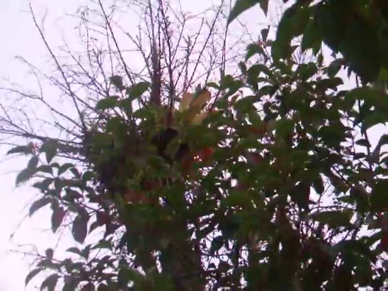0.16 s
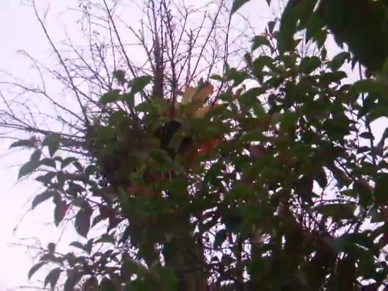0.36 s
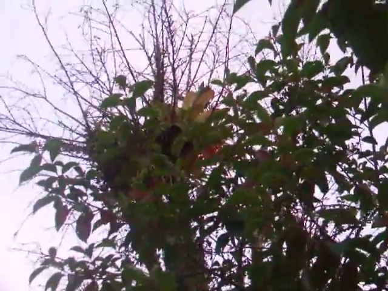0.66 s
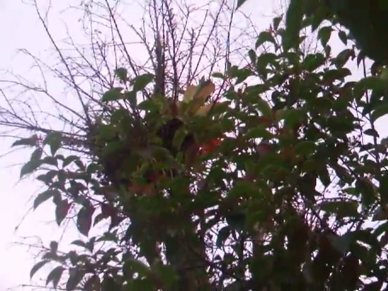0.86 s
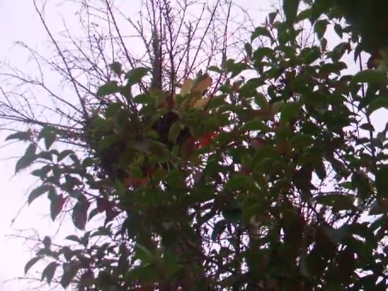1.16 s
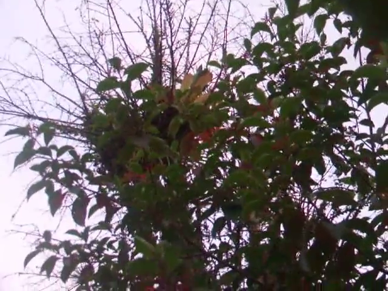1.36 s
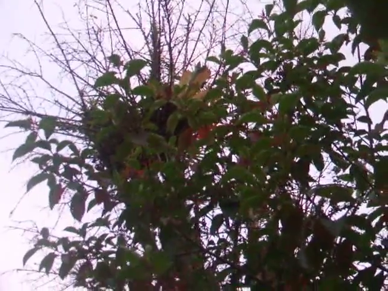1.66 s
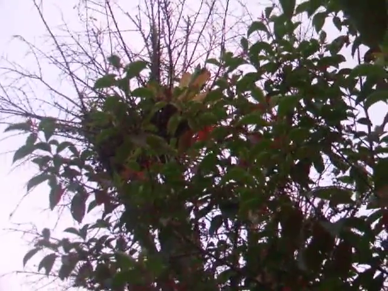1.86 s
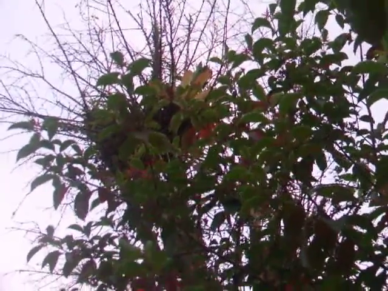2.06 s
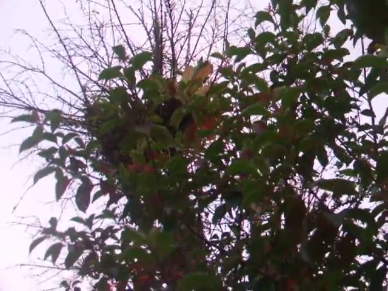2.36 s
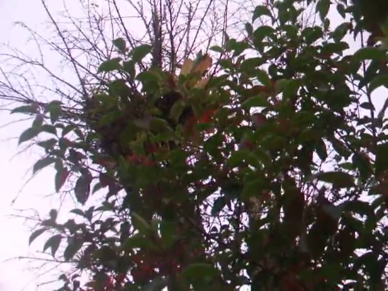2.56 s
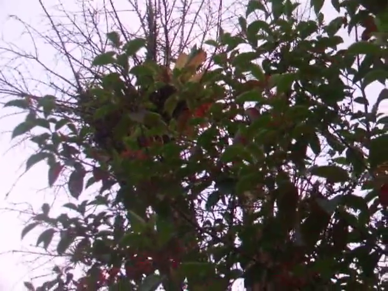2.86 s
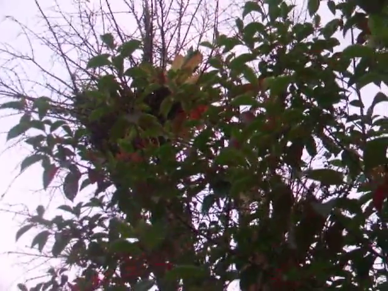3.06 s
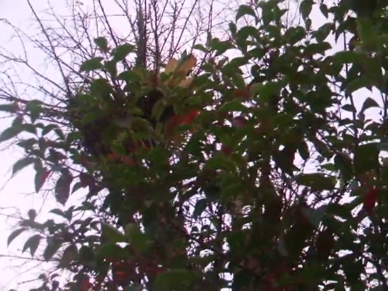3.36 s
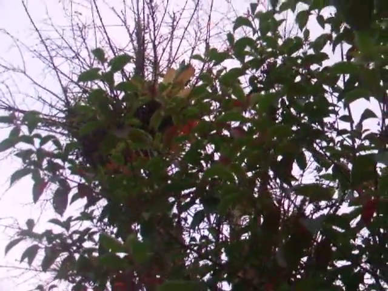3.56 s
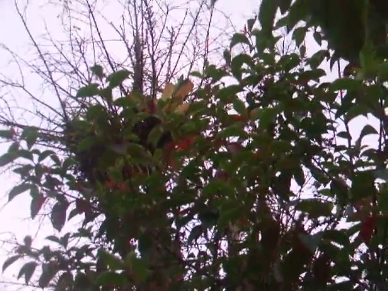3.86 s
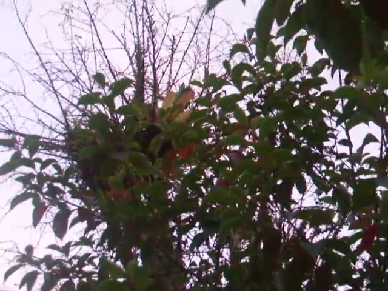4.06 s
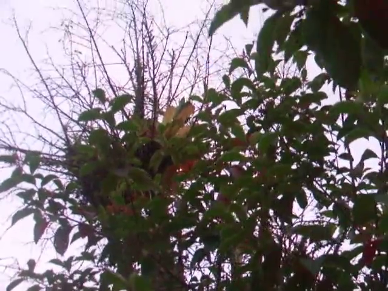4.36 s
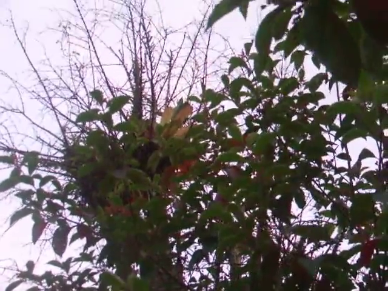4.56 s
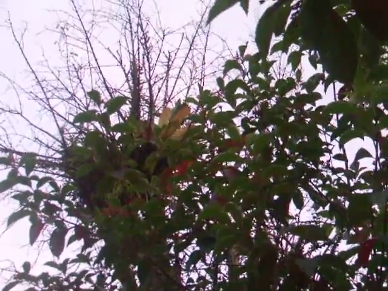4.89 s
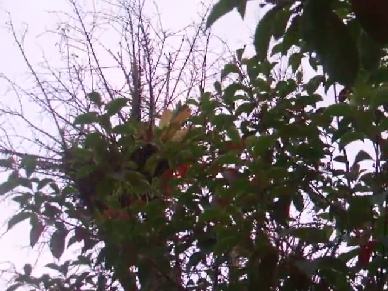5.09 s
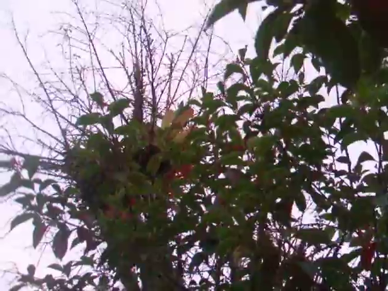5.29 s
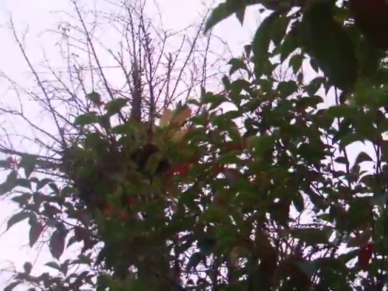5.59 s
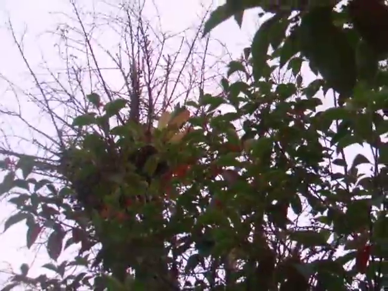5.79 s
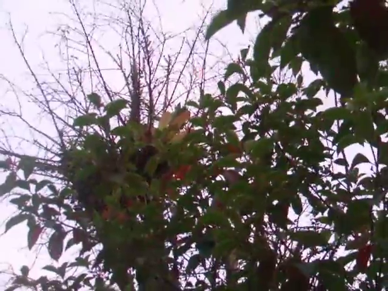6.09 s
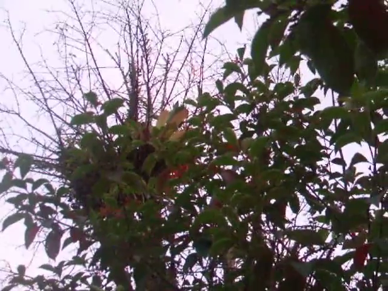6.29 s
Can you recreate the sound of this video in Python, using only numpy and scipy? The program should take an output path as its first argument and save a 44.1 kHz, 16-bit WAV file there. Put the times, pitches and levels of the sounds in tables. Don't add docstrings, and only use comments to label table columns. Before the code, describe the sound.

A dawn garden heard through a modest pocket camera: steady low hum and hiss, a barely audible high whine, and echoes scattered by branches and walls. Lower fluting whistles come in phrases further away, with small chips far off. Nearby finches cut through with sharp, sizzling falling calls, busiest in the middle, then again near the end. A sparrow rasps near the start, snaps its bill, and rasps once more at the close.

```python
import sys
import numpy as np
from scipy import signal
from scipy.fft import rfft, irfft
from scipy.io import wavfile
from scipy.ndimage import uniform_filter1d

SR = 44100
rng = np.random.default_rng(int(sys.argv[2]) if len(sys.argv) > 2 else 0)


def linear_from_db(decibels):
    return 10 ** (np.asarray(decibels, float) / 20)


def dump_mix(stems):
    frames = np.atleast_2d(stems).T
    limited = np.clip(frames, -1, 1)
    pcm = np.round(limited * 32767).astype(np.int16)
    wavfile.write(sys.argv[1], SR, pcm)


N = 283563
RATE_HZ = 16000


def level(x, db):
    return x * linear_from_db(db) / np.sqrt(np.mean(x ** 2))


def walk(size, rate):
    hold = int(SR / rate)
    steps = np.repeat(rng.standard_normal(size // hold + 1), hold)
    return 1.3 * uniform_filter1d(uniform_filter1d(steps, hold), hold)[:size]


def resonance(x, hz, width):
    return signal.lfilter(*signal.iirpeak(hz, hz / width, SR), x)


def add(track, s, sound):
    i = int(s * SR)
    track[i:i + len(sound)] += sound[:len(track) - i]


def syrinx(notes, buzz_hz, uneven, chaos, throb, flutter_db, second_db, edge):
    out = np.zeros(N)
    for note in notes:
        s, *columns = np.transpose(note)
        t = s[0] + np.arange(int((s[-1] - s[0]) * SR)) / SR
        hz, db, swing_hz = (np.interp(t, s, column) for column in columns)
        swing_hz = np.abs(swing_hz)
        drift, shake, flutter = (walk(SR // 2, rate)[:len(t)] for rate in (90, 500, 130))
        buzz = np.cumsum(buzz_hz * (1 + uneven * drift)) * 2 * np.pi / SR
        wobble = np.sin(buzz) - 0.26 * np.cos(2 * buzz) + chaos * np.tanh(shake)
        phase = np.cumsum(hz + swing_hz * wobble) * 2 * np.pi / SR
        tone = np.sin(phase) + linear_from_db(second_db) * np.sin(2 * phase)
        depth = np.clip(throb * swing_hz / 300, 0, .9)
        ends = np.clip(np.minimum(t - s[0], s[-1] - t) / edge, 0, 1)
        strength = np.sqrt(2) * linear_from_db(db + flutter_db * flutter) * ends
        add(out, s[0], strength * (1 + depth * np.cos(buzz)) * tone)
    return out


def calls(rows, habit):
    glide, sag_hz, attack, hold, first_db, last_db, swing_hz, clean = habit
    u = np.linspace(0, 1, num=40)
    notes = []
    for s, length, first_hz, last_hz, db in rows:
        done = np.expm1(-u * length / glide) / np.expm1(-length / glide)
        hz = first_hz + (last_hz - first_hz) * done - sag_hz * np.sin(np.pi * u)
        shape = np.interp(u, [0, attack, min(attack + hold, .95), 1], [first_db, 0, 0, last_db])
        swing = swing_hz * np.clip(u * length / clean, 0, 1)
        notes.append(np.transpose([s + u * length, hz, db + shape, swing]))
    return notes


def slides(rows):
    notes = []
    for s, length, first_hz, middle_hz, last_hz, db in rows:
        start, middle = (s, first_hz, db - 3, 0), (s + length / 2, middle_hz, db, 0)
        notes.append([start, middle, (s + length, last_hz, db - 4, 0)])
    return syrinx(notes, 100, 0, 0, 0, 0.87, -43, 0.0097)


def echoes(x, early_db, early_t60, late_db, late_t60, gap):
    t = np.arange(SR) / SR
    early = rng.standard_normal(SR) * linear_from_db(3 * walk(SR, 400) - 60 * t / early_t60) * (t > gap)
    late = rng.standard_normal(SR) * linear_from_db(-60 * t / late_t60) * (1 - np.exp(-t / .02))
    cloud = sum(c * linear_from_db(db) / np.sqrt(np.sum(c ** 2)) for c, db in ((early, early_db), (late, late_db)))
    return x + signal.fftconvolve(x, cloud)[:N]


# pitch in Hz, strength in dB per Hz.
HUM_COLOUR = [(12, -30), (20, -4.5), (29, -17.5), (48, -7), (75, -9.5), (249, -12), (453, -11),
              (1620, -16.5), (2180, -16), (4850, -23.5), (7240, -23.5), (7800, -22.5), (10100, -59.5),
              (17200, -120)]
# time in seconds, hum level in dB, distant chorus level in dB.
BACKGROUND = [
    (0.0, -48.5, -57.5),
    (1.93, -48, -64),
    (4.03, -49, -55.5),
    (4.21, -49, -55.5),
    (4.62, -49.5, -59.5),
    (6.43, -49, -65),
]


def hum():
    hz = np.fft.rfftfreq(N + 1, 1 / SR)
    colour_hz, colour_db = np.transpose(HUM_COLOUR[1:-1])
    colour = linear_from_db(np.interp(np.log(hz + 1), np.log(colour_hz), colour_db)) * (hz < RATE_HZ / 2) * (hz > 18)
    noise = irfft(rfft(rng.standard_normal(N + 1)) * colour)[:N]
    whine_hz = 7868 + 6 * walk(N, 66)
    whine = np.sin(np.cumsum(whine_hz) * 2 * np.pi / SR) * linear_from_db(0.97 * walk(N, 38))
    s, swell_db, _ = np.transpose(BACKGROUND)
    swell = linear_from_db(np.interp(np.arange(N) / SR, s, swell_db))
    return level(noise, 5.1) * swell + level(whine, -60.5)


def chorus(count=340):
    when, long, pitch, bend, size = rng.random((count, 5)).T
    hz = 2200 + 2600 * pitch ** 1.6
    first_hz, last_hz = hz * (1.05 + .15 * bend), hz * (.97 - .12 * bend)
    rows = np.transpose([when * N / SR, .015 + .04 * long, first_hz, hz, last_hz, -8 * size])
    s, _, db = np.transpose(BACKGROUND)
    return level(slides(rows), 0) * linear_from_db(np.interp(np.arange(N) / SR, s, db))


# start and length in seconds, first and last
# pitch in Hz, level in dB.
WHISTLES = [(.14, .06, 2860, 2910, -55), (.23, .07, 2990, 2840, -55), (.47, .08, 2930, 2990, -55),
            (.62, .08, 2800, 3000, -51), (2.73, .07, 2864, 2924, -51), (3.36, .035, 1960, 1860, -45),
            (4.54, .14, 2540, 2353, -39), (4.69, .12, 3600, 3100, -47), (5.115, .14, 2520, 2380, -34.5),
            (5.14, .13, 3550, 3130, -46), (5.52, .14, 2960, 3000, -57)]
# start and length in seconds, first and last pitch in Hz, level in dB.
SLURS = [
    (1.31, .24, 2410, 2030, -40),
    (3.47, .27, 2350, 1950, -38),
]
# start and length in seconds, first and last pitch in Hz, level in dB.
DIPS = [
    (.22, .14, 2150, 2190, -43),
    (1.23, .11, 1957, 1720, -42),
    (3.4, .1, 1910, 1770, -44),
    (4.63, .15, 2250, 2020, -45),
    (5.19, .14, 2250, 2080, -39),
    (2.37, .08, 4180, 4120, -44),
]
# start and length in seconds, first and last pitch in Hz, level in dB.
WARBLES = [
    (.72, .14, 3050, 2910, -37),
    (1.37, .13, 5780, 5100, -57),
    (2.26, .04, 1840, 2050, -46),
    (2.83, .14, 3170, 2950, -35.5),
    (3.93, .11, 2450, 2540, -44),
    (5.695, .12, 3150, 2960, -38),
]
# start and length in seconds, first and last pitch in Hz, level in dB.
TRILLS = [
    (.82, .16, 2450, 2620, -39),
    (2.94, .18, 2530, 2520, -37),
    (5.7, .14, 2750, 2550, -43),
]
# start and length in seconds, first and last pitch in Hz, level in dB.
PIPS = [
    (.17, .09, 2480, 2450, -36),
    (.31, .11, 1870, 1830, -44),
    (4.74, .13, 1820, 1850, -46),
    (5.3, .14, 1840, 1850, -37),
]
# start and length in seconds, first and last pitch in Hz, level in dB.
SWOOPS = [
    (1.83, .19, 2080, 2640, -38.5),
]
# start and length in seconds, first and last pitch in Hz, level in dB.
ARCHES = [
    (2.28, .36, 1950, 1955, -39.5),
]
# glide in seconds, sag in Hz, attack and hold as shares of the
# note, first and last level in dB, buzz swing in Hz, clean start in seconds.
WHISTLE = (.3, 0, .4, .25, -11, -8, 55, .05)
SLUR = (.1, 0, .3, .25, -10, -10, 35, .05)
DIP = (.06, 130, .3, .4, -6, -7, 105, .01)
WARBLE = (.025, 0, .5, .25, -6, -7, 120, .06)
TRILL = (.12, 0, .45, .2, -12, -10, 280, .04)
PIP = (.1, 0, .2, .15, -4, -17, 10, .05)
SWOOP = (.07, 0, .2, .3, -12, -7, 200, .08)
ARCH = (.03, -70, .35, .3, -7, -8, 10, .05)


def thrush():
    kinds = (WHISTLES, SLURS, DIPS, WARBLES, TRILLS, PIPS, SWOOPS, ARCHES)
    habits = (WHISTLE, SLUR, DIP, WARBLE, TRILL, PIP, SWOOP, ARCH)
    return syrinx(sum(map(calls, kinds, habits), []), 170, .3, .3, .3, 3, -40, .01)


# start and length in seconds, first and last pitch in Hz, level in dB.
THIN_FLICKS = [
    (.345, .095, 7870, 6480, -33.5),
    (3.091, .022, 8180, 6700, -25),
]
# start and length in seconds, first and last pitch in Hz, level in dB.
FLICKS = [
    (3.491, .12, 8300, 6900, -23),
    (3.995, .13, 8300, 6900, -27),
]
# start and length in seconds, first and last pitch in Hz, level in dB.
SEEPS = [
    (.875, .165, 7530, 6850, -49),
    (1.85, .125, 7700, 6640, -34),
    (3.32, .13, 7430, 6850, -46),
    (5.395, .15, 8100, 6680, -32),
]
# start and length in seconds, first and last pitch in Hz, level in dB.
ZEETS = [
    (2.418, .157, 8700, 7100, -24.5),
    (5.987, .163, 9000, 7000, -22),
]
# start and length in seconds, first and last pitch in Hz, level in dB.
BUZZES = [
    (.555, .19, 6550, 7700, -39),
    (2.672, .1, 6450, 6950, -26.5),
    (2.88, .05, 6300, 7500, -42),
    (6.246, .072, 6250, 6850, -23),
]
# start and length in seconds, first and last pitch in Hz, level in dB.
RATTLES = [
    (1.05, .12, 7500, 7900, -49),
    (1.705, .02, 7100, 7270, -47),
    (1.78, .065, 7000, 6900, -37),
    (1.9, .1, 7600, 7300, -43),
    (2.11, .09, 7300, 7450, -52),
    (2.91, .13, 7900, 7600, -41),
    (5.44, .13, 7600, 7500, -41),
]
# glide in seconds, sag in Hz, attack and hold as shares of the
# call, first and last level in dB, buzz swing in Hz, clean start in seconds.
THIN_FLICK = (.006, 0, .55, .2, -7, -13, 260, .025)
FLICK = (.006, 0, .35, .2, -9, -9, 480, .05)
SEEP = (.045, 0, .2, .55, -4, -6, 110, .03)
ZEET = (.024, 0, .33, .22, -16, -9, 370, .1)
BUZZ = (.03, 0, .25, .35, -14, -13, 470, .05)
RATTLE = (.05, 0, .3, .4, -3, -5, 560, .01)


def finches():
    kinds = (FLICKS, THIN_FLICKS, SEEPS, ZEETS, BUZZES, RATTLES)
    habits = (FLICK, THIN_FLICK, SEEP, ZEET, BUZZ, RATTLE)
    return syrinx(sum(map(calls, kinds, habits), []), 245, .22, .2, .42, 2.5, -60, .004)


# start and length in seconds, first and last pitch in Hz, level in dB.
RASPS = [
    (.512, .08, 2695, 3100, -41),
    (.515, .07, 3800, 4000, -45),
    (6.338, .062, 2790, 3150, -41),
    (6.345, .065, 4300, 4400, -46),
]
# glide in seconds, sag in Hz, attack and hold as shares of the call,
# first and last level in dB, buzz swing in Hz, clean start in seconds.
RASP = (.1, 0, .3, .3, -3, -12, 620, .02)
# start in seconds, peak level in dB.
SNAPS = [
    (0.7977, -38.5),
    (0.8137, -33),
    (0.8355, -26),
    (.865, -36),
    (.893, -38),
    (0.9244, -34),
    (0.9524, -38),
]


def sparrow():
    out = syrinx(calls(RASPS, RASP), 480, .2, .4, .2, 2.5, -1.5, .008)
    t = np.arange(SR // 100) / SR
    for s, db in SNAPS:
        click = 2.5 * rng.standard_normal(len(t))
        ring = resonance(resonance(click, 5400, 1500), 5400, 1500)
        add(out, s, linear_from_db(db) * np.exp(-t / .002) * ring)
    return out


# start and length in seconds, first and last pitch in Hz, level in dB.
FALLS = [(3.43, .069, 6300, 5850, -52), (4.6, .097, 5870, 5250, -57), (5.29, .025, 4700, 4100, -52),
         (2.498, .06, 3500, 3300, -51.5), (2.82, .031, 5100, 4370, -49), (2.875, .072, 3520, 3360, -48.5),
         (3.2, .047, 5250, 4400, -46), (3.25, .062, 4160, 3630, -48), (3.377, .043, 3150, 2500, -50.5),
         (3.504, .015, 4800, 3700, -38), (3.553, .028, 4400, 3800, -46), (3.669, .03, 2900, 2470, -48.5),
         (3.855, .033, 3130, 2770, -47), (4.007, .025, 3460, 3220, -45), (4.296, .031, 4270, 3580, -44),
         (4.49, .023, 3570, 3380, -47), (4.513, .046, 4600, 3720, -44), (4.83, .022, 4810, 4200, -51),
         (5.009, .025, 4850, 4250, -48), (5.397, .016, 4650, 3850, -52), (5.456, .04, 5200, 4600, -53),
         (5.69, .05, 5400, 4200, -48), (5.747, .037, 4300, 3680, -47)]
# start and length in seconds, first and last pitch in Hz, level in dB.
RISES = [(1.93, .12, 5560, 5500, -59), (2.733, .11, 3520, 3800, -50.5), (2.758, .07, 4000, 4040, -54),
         (3.44, .069, 2660, 4800, -45.5), (3.732, .077, 2700, 3370, -46), (4.013, .042, 4710, 5500, -43.5),
         (4.082, .045, 4400, 5530, -43), (4.285, .014, 3250, 4200, -39), (4.665, .025, 3600, 4400, -43),
         (4.93, .059, 3940, 4400, -48.5), (5.102, .028, 4160, 4040, -50), (5.5, .04, 4150, 4550, -52)]


def chips():
    rows = []
    for kind, midway in ((FALLS, .65), (RISES, .28)):
        for s, length, first_hz, last_hz, db in kind:
            middle_hz = first_hz + midway * (last_hz - first_hz)
            rows.append((s, length, first_hz, middle_hz, last_hz, db))
    return slides(rows)


def scene():
    distant = echoes(chorus(), 2, .2, 2, .7, .005)
    far = echoes(thrush(), -1.5, .3, -5, .8, .005)
    near = echoes(finches(), -2.5, .2, -11, .7, .003)
    small = echoes(chips() + sparrow(), -5, .12, -11, .6, .005)
    return (near + far + small + distant + hum())[None]


def low_pass(x):
    return signal.sosfilt(signal.butter(12, 9110, fs=SR, output="sos"), x)


# pitch in Hz, gain in dB.
SMOOTHING = [(7000, -2), (7800, -4.5), (8150, -8), (8500, -19), (8850, -32.5), (9050, -39), (9150, -90)]


def record(dry):
    size = SR * (N // SR + 1)
    hz = np.fft.rfftfreq(size, 1 / SR)
    top = RATE_HZ * size // SR
    spectrum = rfft(dry[0], size) * (hz < RATE_HZ * .75)
    spectrum[:top + 1] = spectrum[:top + 1] + np.conj(spectrum[top::-1])
    smoothing = linear_from_db(np.interp(hz, *np.transpose(SMOOTHING)))
    heard = irfft(spectrum * smoothing, size)[:N]
    mix = heard[None] - .0024
    return low_pass(mix)


dry = scene()
out = record(dry)
dump_mix(out)
```